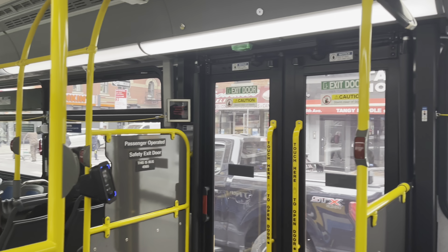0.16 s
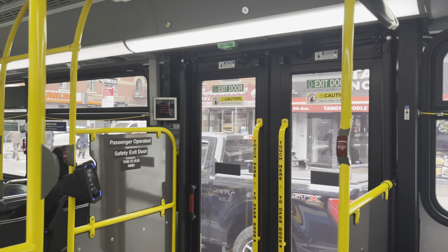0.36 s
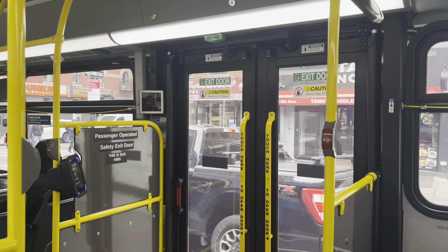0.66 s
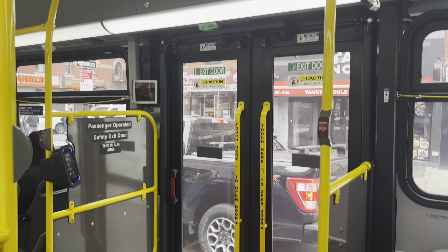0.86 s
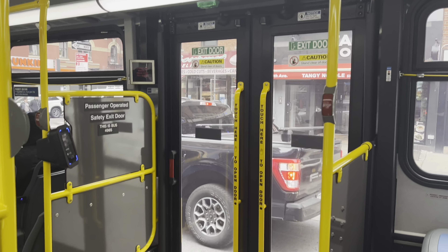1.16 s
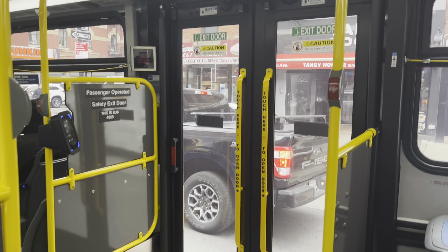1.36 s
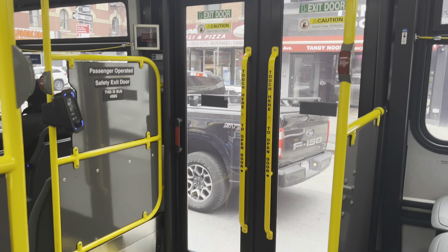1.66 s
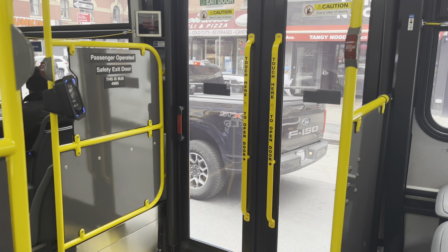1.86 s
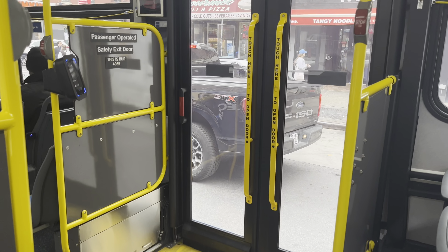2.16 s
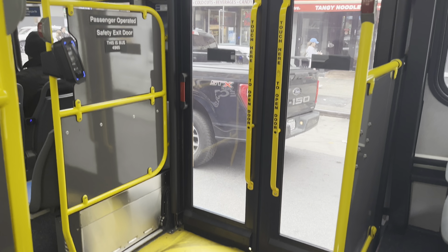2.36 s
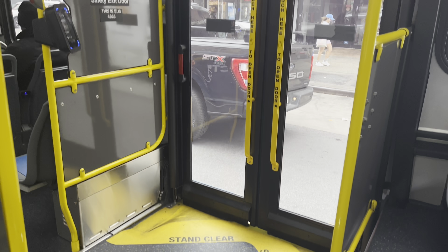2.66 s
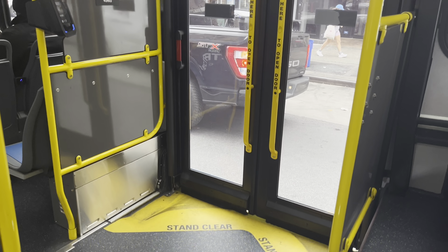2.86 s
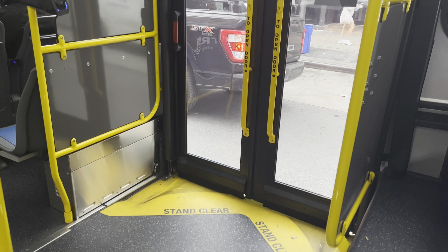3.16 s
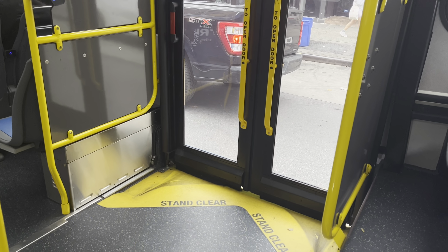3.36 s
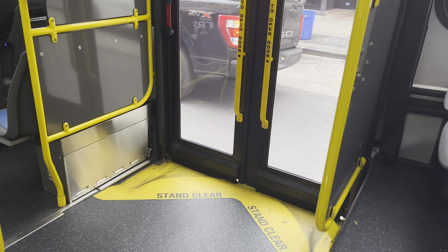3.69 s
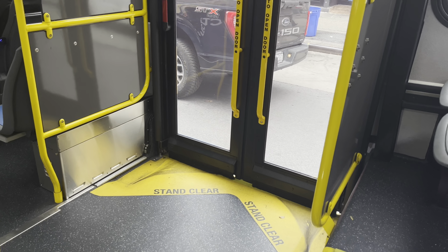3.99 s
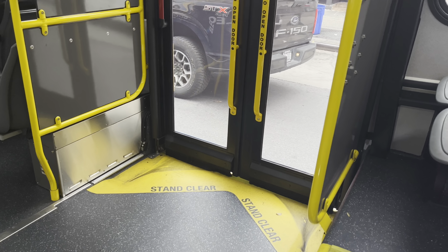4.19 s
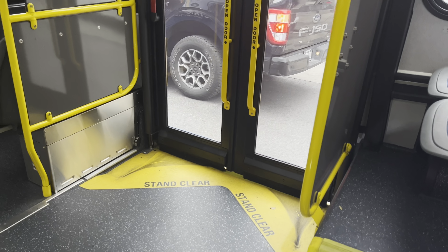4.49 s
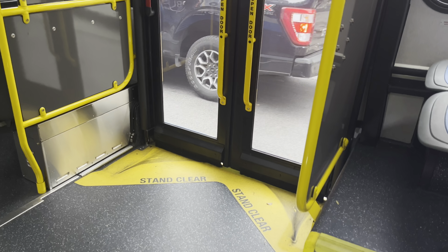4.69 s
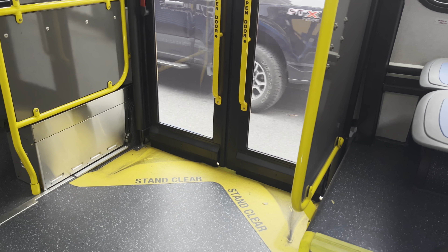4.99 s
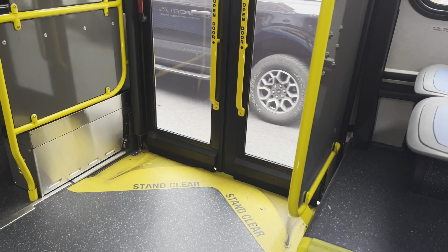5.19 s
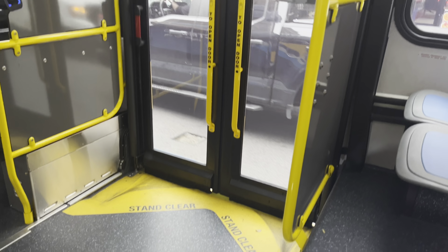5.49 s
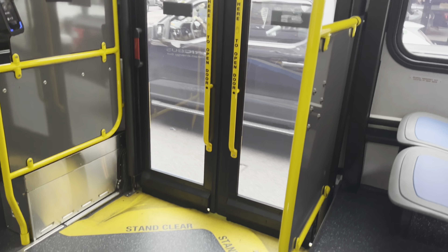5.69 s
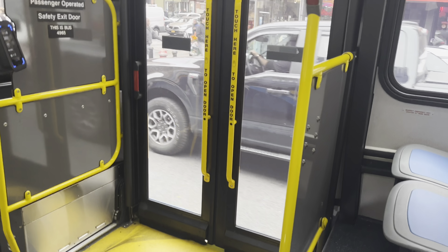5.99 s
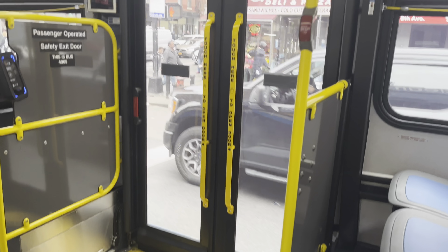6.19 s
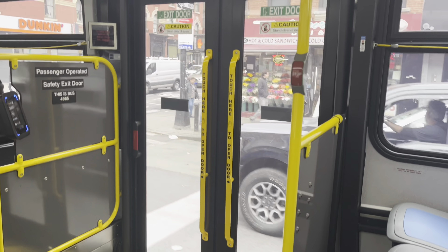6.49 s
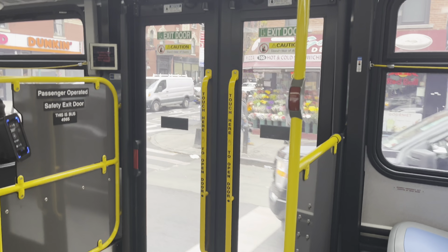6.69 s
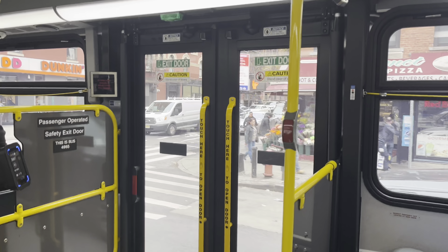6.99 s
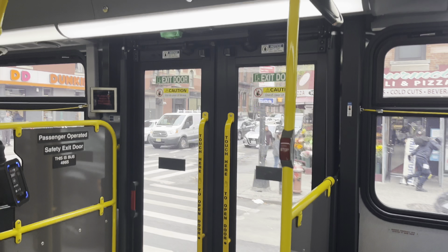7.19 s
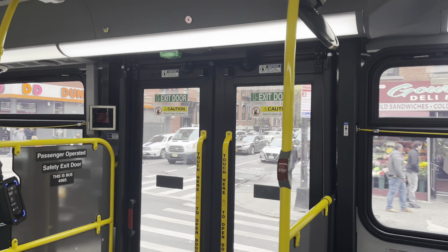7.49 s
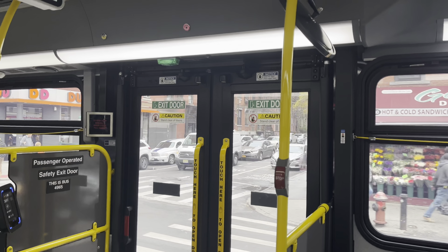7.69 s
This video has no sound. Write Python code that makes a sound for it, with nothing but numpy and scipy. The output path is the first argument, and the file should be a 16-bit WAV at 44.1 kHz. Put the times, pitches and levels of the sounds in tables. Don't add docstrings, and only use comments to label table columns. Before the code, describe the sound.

Heard from a handheld phone inside an electric bus: a deep compressor hum, fan tones and vent hiss fill the cabin while it waits, with dull thuds and a soft gasp of valve air. Then the motor starts, its low growl climbing smoothly into a whine over road rumble, with small air puffs, clicking ticks and more muffled knocks. The stereo hum shifts as the phone moves.

```python
import sys
import numpy as np
from scipy import signal
from scipy.fft import rfft, irfft, next_fast_len
from scipy.io import wavfile
from scipy.ndimage import uniform_filter1d

SR = 44100
rng = np.random.default_rng(int(sys.argv[2]) if len(sys.argv) > 2 else 0)


def magnitude_from_level(level_db):
    exponent = np.asarray(level_db, float) / 20
    return 10 ** exponent


def to_wav(s):
    ch = np.atleast_2d(s).T
    pcm = np.round(np.clip(ch, -1, 1) * 32767)
    wavfile.write(sys.argv[1], SR, pcm.astype(np.int16))


N = 346185
T = np.arange(N) / SR
COARSE = np.arange(0, N + 64, 64) / SR
SIZE = next_fast_len(N)
BINS = np.maximum(np.arange(SIZE // 2 + 1) * SR / SIZE, 1)

# (time [s], place [0 doors .. 7 rear], facing the floor [0-1],
# treble left minus right [dB])
PHONE_PATH = [(0, -0.5, 0.1, 2), (1.05, 0, 0, 2.5), (1.5, 1, 0.6, 2.5), (2.1, 1, 1, 1),
              (2.35, 1.5, .9, 2.5), (2.65, 3, 0.8, 3), (3.3, 3, .85, 3), (3.6, 4, 1, 1),
              (4.1, 4, 0.94, 2.5), (4.5, 5, 1, 2.5), (5.3, 5, 0.7, 1), (6.03, 5, 0.7, 5),
              (6.35, 6, 0.1, 3.5), (6.9, 6, 0, 3.5), (7.4, 7, 0, 3), (7.85, 7, 0, 4.5)]

SHAFT_HZ = 107.97
SHAFT_ORDERS = [1, 4, 8, 12, 16]
FAN_HZ = [415.3, 699.8, 1049.8, 1421.5, 2327.7, 2436.7, 4000.0, 5183.0]
# (left level [dB], right level [dB], left leads [rad])
AT_DOORS = [(-37, -42, 0.3), (-40, -43, -0.1), (-40, -67, -0.7), (-59, -60, -2.7), (-52, -54, -2.5),
            (-59, -60, 3.1), (-47, -46, 0.8), (-52, -51, -2.2), (-59, -55, 2.6), (-65, -64, 2.6),
            (-65, -71, 2.9), (-89, -82, 0.3), (-69, -73, -1.1)]
AT_TURN = [(-34, -37, 0.2), (-48, -46, 0.0), (-40, -43, 0.0), (-77, -57, -1.3), (-55, -53, -2.6),
           (-55, -57, 3.0), (-59, -60, 0.8), (-63, -60, -2.3), (-55, -65, 2.2), (-62, -66, 1.3),
           (-72, -83, 1.9), (-79, -87, -0.0), (-70, -77, 0.1)]
AT_SWING = [(-33, -35, 0.2), (-43, -42, -0.1), (-40, -40, -0.1), (-60, -56, 2.4), (-67, -51, 0.2),
            (-48, -61, 3.0), (-55, -54, 1.2), (-57, -59, -2.4), (-58, -57, -2.2), (-71, -63, 3.1),
            (-63, -71, -3.1), (-94, -95, 2.6), (-96, -79, 0.5)]
AT_FLOOR = [(-32, -33, 0.1), (-47, -47, 0.3), (-41, -40, -0.6), (-56, -56, 2.0), (-46, -49, 0.5),
            (-46, -65, -2.9), (-45, -43, 3.1), (-56, -58, -0.1), (-52, -63, -1.8), (-65, -64, 2.6),
            (-61, -71, -0.6), (-87, -92, 0.7), (-69, -76, -0.1)]
AT_LEAN = [(-34, -36, 0.0), (-47, -48, 0.5), (-41, -41, -0.6), (-51, -52, 1.9), (-45, -49, 0.4),
           (-50, -62, -2.6), (-46, -44, 3.1), (-57, -57, -0.0), (-59, -83, 1.7), (-62, -63, 2.6),
           (-61, -68, -0.8), (-80, -93, 0.7), (-67, -83, -0.8)]
AT_STEP = [(-35, -38, 0.1), (-47, -47, 0.4), (-39, -40, -0.5), (-53, -53, 1.9), (-45, -52, 0.1),
           (-56, -58, -3.0), (-49, -45, 2.9), (-52, -54, 0.5), (-57, -57, -1.9), (-63, -67, 1.9),
           (-74, -76, 0.5), (-67, -75, 2.2), (-74, -81, -1.8)]
AT_WINDOW = [(-39, -45, 0.3), (-44, -49, 0.7), (-37, -47, 0.2), (-59, -64, 0.6), (-54, -55, -3.1),
             (-50, -52, 1.3), (-61, -51, 2.8), (-61, -64, 2.8), (-55, -58, -0.2), (-63, -67, 3.1),
             (-72, -70, 3.1), (-62, -77, 3.0), (-65, -82, 0.7)]
AT_REAR = [(-37, -39, 0.5), (-43, -47, -0.1), (-39, -52, 0.7), (-63, -58, 0.2), (-58, -57, 3.1),
           (-52, -54, 2.6), (-51, -49, 1.7), (-68, -61, -1.9), (-57, -53, 2.3), (-68, -81, 1.0),
           (-69, -67, -0.8), (-61, -68, -1.7), (-72, -88, -0.4)]

# (time [s], main order [Hz])
MOTOR_SPEED = [(3.6, 38.7), (3.86, 46.5), (4.1, 59.6), (4.4, 81.2), (5.03, 131.2), (5.42, 165), (5.55, 174),
               (5.8, 189), (5.93, 201), (6.09, 211.6), (6.63, 245), (7.0, 266), (7.43, 283), (7.85, 296)]
ORDERS_DB = [
    -0.5,
    -12,
    -10.5,
    -23,
    -19,
]
# (frequency [Hz], width [Hz], level [dB])
BODY_MODES = [(53, 20, -35.5), (65.7, 8.5, -22), (74.6, 9.5, -20.5), (86.7, 12, -26.5), (97.5, 8, -30),
              (108.8, 7, -24), (120.7, 10, -27), (129.3, 11, -24), (140.7, 8, -27.5), (175.5, 9, -25),
              (183.8, 11.1, -22), (208.8, 22.4, -30.5), (226, 5.9, -45), (291, 44, -39)]
# (time [s], level [dB])
GEAR_LEVEL = [(4.3, -66), (4.68, -41), (4.95, -62), (6.3, -51), (6.6, -60), (6.97, -56), (7.25, -59),
              (7.5, -57), (7.7, -51), (7.85, -50)]
# (loudest at [s], frequency then [Hz], climb [Hz/s], level [dB])
SPIN_UP = [
    (2.1, 1560, 69.7, -56),
    (6.3, 1478, 105, -57.5),
]

# (time [s], level [dB], rise [s], t60 [s], left minus right [dB])
PUFFS = [(.72, -65, .02, .2, 4), (2.29, -45.5, 0.087, 0.71, 2.5), (2.42, -59.5, 0.034, 0.55, 0),
         (3.23, -55.5, 0.025, 0.33, 1), (3.313, -54.5, .006, 0.44, 2), (3.44, -56, 0.033, 0.43, 1),
         (4.13, -57.5, .02, 0.35, -3), (4.222, -46.5, 0.003, 0.3, 3), (4.235, -55, 0.015, 0.6, 4.5),
         (5.52, -62, .05, .9, -5), (5.84, -57, .04, .6, 3), (6.031, -55.5, .003, .3, 2),
         (6.105, -56, .003, 0.27, 3), (6.69, -59, .03, .4, 0), (6.937, -56, 0.0033, 0.38, 3),
         (7.605, -60, .005, 0.2, -2), (7.627, -60, .005, 0.37, -3), (7.72, -59, .005, .3, 0)]
# (frequency [Hz], level per Hz [dB])
JET_SPECTRUM = [(1200, -31), (2500, -6), (3500, 4), (5000, -0.5), (6500, -3), (7800, -12), (9000, -10),
                (11000, -5.5), (13500, -8), (14600, -15.5), (15000, -50)]
# (time [s], level [dB])
TICKS = [
    (3.325, -60),
    (4.22, -50),
    (6.017, -56),
    (6.030, -45),
    (6.105, -38.5),
    (6.937, -42.5),
    (7.72, -49),
]
# (time [s], level [dB], frequency [Hz], t60 [s], left leads [rad])
THUDS = [(.11, -22.5, 79, 0.26, .3), (0.77, -22.5, 75, 0.34, 0.26), (1.4383, -20, 90, 0.14, 0.75),
         (2.31, -29, 211, 0.27, 0.33), (2.419, -33, 171.7, 0.31, .3), (2.52, -31, 196, 0.16, .3),
         (3.45, -30, 76, 0.45, 0.24), (3.84, -38, 700, 0.11, 1.7), (4.03, -46, 828, 0.39, 1.8),
         (6.922, -32, 148, 0.33, 0.26), (7.38, -27.5, 95.7, 0.24, 0.32), (7.52, -36.5, 399, 0.23, 0.86),
         (7.53, -42, 860, 0.21, 3.2), (7.525, -48, 1300, 0.15, 1.0), (7.53, -46, 1560, 0.1, .5),
         (7.562, -39, 1450, .03, .5), (7.562, -44, 1780, .03, .5), (3.6, -34, 210, 0.47, .3),
         (4.24, -34.5, 220, 0.39, .3), (5.1, -38, 222, 0.41, .3), (2.402, -47, 3300, .04, .5),
         (2.455, -47, 2750, .05, .5), (2.32, -45, 2480, .05, .5), (6.9, -35, 250, 0.28, .3),
         (7.72, -46, 605, 0.5, 0.51), (7.56, -36.5, 1560, 0.04, .5), (7.61, -43, 519, 0.49, .4),
         (2.34, -27, 90.5, 0.11, .3), (2.38, -36, 190, 0.17, .3), (7.63, -46, 1480, .08, .5)]

# (frequency [Hz], level per Hz [dB])
CABIN_SPECTRUM = [(22, -18), (45, -1.5), (70, 0.5), (96, -2.5), (125, -7.5), (160, -7.5), (216, -11.5),
                  (320, -11.5), (420, -13), (500, -16), (620, -22), (846, -21.5), (1220, -27), (1500, -26),
                  (1800, -29.5)]
HISS_SPECTRUM = [(1060, -34), (1800, -1.5), (2100, -1), (2380, -1), (2440, -2), (2880, -6), (3390, -8.5),
                 (4180, -7.5), (4640, -10), (5380, -13.5), (5920, -16.5), (6570, -18.5), (7880, -32.5),
                 (13100, -29), (14400, -33), (15000, -75)]
# (frequency [Hz], correlation [-1 to 1])
ALIKE_DOORS = [(60, 0.21), (130, 0.64), (280, 0.55), (620, -0.34), (1350, -0.36), (2930, -0.16),
               (6390, -0.22), (13900, 0.53)]
ALIKE_FLOOR = [(60, 0.78), (130, 0.82), (280, 0.76), (620, -0.27), (1350, -0.64), (2930, -0.084),
               (6390, -0.14), (13900, 0.52)]
# (frequency [Hz], left minus right [dB])
LEFT_MORE = [(60, -0.5), (110, 3), (200, -0.5), (370, 2), (680, -1), (1240, 6), (2260, -1.5), (4150, 9),
             (7600, 3), (13900, -10.5)]
# (time [s], level [dB])
ROAD = [(0, 0), (.5, -0.5), (2, 0), (2.4, -2.5), (2.65, 0.5), (3.2, -1), (3.85, 3), (4.5, 1), (5.05, 3.5),
        (5.6, 2.5), (6.2, 0.5), (7.3, 3), (7.6, 2), (7.85, 1.5)]
# (time [s], level [dB], length [s])
RUSHES = [
    (0, 1, .1),
    (.76, 4.5, 0.045),
    (2.424, 1.5, 0.15),
    (5.36, 1.5, .15),
    (7.59, 1, 0.11),
]
# share of the shaking, change facing the floor [dB],
# share of the rushes
ROAD_SHARE = [1.53, .1, 0.2, 0.086]
FLOOR_DB = [-0.8, -0.45, -0.56, .2]
RUSH_SHARE = [.01, .2, .3, 1.01]

# (frequency [Hz], level [dB])
SUM_COLOUR = [(7000, 0.5), (7700, 0), (8100, -0.5), (8700, 1), (9500, 1), (13300, -3), (13900, -5),
              (14500, -8), (15000, -10), (16000, -13.5)]
DIFFERENCE_COLOUR = [(6500, -1), (8000, 4), (10200, 2), (10500, -31.5), (13100, -30), (13500, -8.5),
                     (14000, 3), (15000, -4), (15500, -12), (16000, -29.5)]


def curves(table, times=COARSE):
    s, *columns = np.transpose(table)
    return [np.interp(times, s, column) for column in columns]


def at_hz(table, hz):
    table_hz, values = np.transpose(table)
    return np.interp(np.log(hz), np.log(table_hz), values)


def fine(control):
    return np.interp(T, COARSE, control)


def unit(x):
    return x / np.sqrt(np.mean(x ** 2))


def walk(rate):
    k = max(int(SR / 64 / rate), 2)
    held = np.repeat(rng.standard_normal(len(COARSE) // k + 1), k)[:len(COARSE)]
    return unit(uniform_filter1d(uniform_filter1d(held, k), k))


def sides(pan_db):
    return magnitude_from_level(np.array([pan_db, -pan_db]) / 2)


def resonance(hz, centre_hz, width_hz):
    return 1 / (1 + (2 * (hz - centre_hz) / width_hz) ** 2)


def hum(place):
    tones_hz = np.sort(np.r_[SHAFT_HZ * np.array(SHAFT_ORDERS), FAN_HZ])
    field = np.array([AT_DOORS, AT_TURN, AT_SWING, AT_FLOOR, AT_LEAN, AT_STEP, AT_WINDOW, AT_REAR])
    out = np.zeros((2, N))
    for k, hz in enumerate(tones_hz):
        tone = np.exp(2j * np.pi * hz * T)
        for ear, lead in enumerate((1, 0)):
            wave = magnitude_from_level(field[:, k, ear]) * np.exp(1j * lead * field[:, k, 2])
            tremble_rad = 1.2 if 2000 < hz < 3000 else 0.15
            tremble = magnitude_from_level((0.6 + hz / 2500) * walk(4)) * np.exp(1j * tremble_rad * walk(5))
            heard = np.interp(place, np.arange(len(field)), wave) * tremble
            out[ear] += np.sqrt(2) * (fine(heard) * tone).imag
    return out


def motor():
    opposed_above_hz, body_floor_db = 195, -51.5
    hz, = curves(MOTOR_SPEED)
    turn = 2 * np.pi * np.cumsum(fine(hz)) / SR + np.array([[0.25], [-0.25]])
    running = np.clip((T - MOTOR_SPEED[0][0]) / 0.3, 0, 1)
    orders = 0
    for db, ratio in zip(ORDERS_DB, (1, 1 / 3, 3.1, 4 / 5, 3 / 2)):
        body = magnitude_from_level(body_floor_db) * np.sign(opposed_above_hz - ratio * hz)
        for mode_hz, width_hz, mode_db in BODY_MODES:
            swell = resonance(ratio * hz, mode_hz, width_hz) ** 2
            body = body + np.sign(opposed_above_hz - mode_hz) * magnitude_from_level(mode_db) * swell
        orders = orders + fine(magnitude_from_level(db) * body) * np.sin(ratio * turn)
    return np.sqrt(2) * running * orders * sides(1.2)[:, None]


def gear():
    hz, = curves(MOTOR_SPEED)
    level_db, = curves(GEAR_LEVEL)
    turn = 2 * np.pi * 2.08 * np.cumsum(fine(hz + 0.4 * walk(8))) / SR
    return np.sqrt(2) * fine(magnitude_from_level(level_db + 3.5 * walk(13))) * np.sin(turn + np.array([[0.5], [0]]))


def spin_up():
    waver_hz, flutter_db = 12 * walk(30), 3.5 * walk(12)
    out = 0
    for s, hz, climb, db in SPIN_UP:
        away = COARSE - s
        turn = 2 * np.pi * np.cumsum(fine(hz + climb * away + waver_hz)) / SR
        gain = magnitude_from_level(db - 16.5 * away ** 2 + flutter_db)
        out = out + np.sqrt(2) * fine(gain) * np.sin(turn + np.array([[0], [1.3]]))
    return out


def thuds():
    longest = SR // 3
    out = np.zeros((2, N))
    slip = np.cumsum(rng.standard_normal((len(THUDS), 3, 1, longest)), axis=3)
    for (s, db, hz, t60, lead), wander in zip(THUDS, slip):
        at = int(s * SR)
        t = T[:min(longest, N - at)]
        turn = 2 * np.pi * hz * t + np.array([[lead], [0]])
        loose = np.sqrt(0.25 * hz / SR) * uniform_filter1d(wander, int(SR / hz))[..., :len(t)]
        ring = np.sin(turn + loose[0])
        ring = ring + 0.5 * np.sin(1.3 * turn + loose[1])
        ring = ring + 0.24 * np.sin(1.9 * turn + loose[2])
        push = 1 - np.exp(-t * (hz + 150) / 5.0)
        decay = 1000 ** (-t / t60) * np.sqrt(1 - 3 * t)
        out[:, at:at + len(t)] += magnitude_from_level(db + 6.0) * push * decay * ring
    return out


def puffs():
    noise = rfft(rng.standard_normal((3, SIZE)))
    jet = unit(irfft(noise * magnitude_from_level(at_hz(JET_SPECTRUM, BINS)), SIZE)[:, :N])
    jet = (0.53 * jet[0] + 1.48 * jet[1:]) * fine(magnitude_from_level(1.6 * walk(200)))
    out = np.zeros((2, N))
    for s, db, rise, t60, pan_db in PUFFS:
        at = int(s * SR)
        t = T[:min(SR, N - at)]
        envelope = magnitude_from_level(db) * (1 - np.exp(-t / rise)) * 1000 ** (-t / t60)
        out[:, at:at + SR] += jet[:, at:at + SR] * envelope * sides(pan_db)[:, None]
    return out


def ticks():
    snaps = np.diff(rng.standard_normal((len(TICKS), 2, 302)), 2) / 2
    t = T[:300]
    ring = 0.99 * np.sin(2 * np.pi * 4600 * t)
    decay = np.exp(-t / 0.0012)
    out = np.zeros((2, N))
    for (s, db), snap in zip(TICKS, snaps):
        at = int(s * SR)
        out[:, at:at + 300] += magnitude_from_level(db) * ((snap + snap[0]) / 2 + ring) * decay
    return out


def pump(facing):
    tone = np.sin(2 * np.pi * 719 * T + np.array([[1.6], [0]]))
    return np.sqrt(2) * fine(magnitude_from_level(-63 + 4.0 * facing + 1.5 * walk(4.7))) * tone


def panel(facing):
    drone = irfft(rfft(rng.standard_normal(SIZE)) * resonance(BINS, 221, 15), SIZE)[:N]
    level_db = -45.5 - 12 * (1 - facing) - 8 * (COARSE < 2.6)
    return unit(drone) * fine(magnitude_from_level(level_db))


def duct(facing):
    song = irfft(rfft(rng.standard_normal((2, SIZE))) * resonance(BINS, 546, 22), SIZE)[:, :N]
    level_db = -49 - 12 * np.sqrt(facing) + 1.5 * walk(4)
    return unit(song + 0.6 * song[::-1]) * fine(magnitude_from_level(level_db))


def air(facing, pan_db):
    road_db, = curves(ROAD)
    rush_db = sum(db * np.exp(-((COARSE - s) / span) ** 2) for s, db, span in RUSHES)
    band_db = np.outer(ROAD_SHARE, road_db) + np.outer(FLOOR_DB, facing) + np.outer(RUSH_SHARE, rush_db)
    swell_db = band_db - np.mean(band_db, axis=1, keepdims=True)

    join_db = at_hz(CABIN_SPECTRUM, 1800) - at_hz(HISS_SPECTRUM, 1800)
    shape_db = np.where(BINS < 1800, at_hz(CABIN_SPECTRUM, BINS), at_hz(HISS_SPECTRUM, BINS) + join_db)
    ripple_db = np.interp(BINS, np.arange(1000) * 35, rng.standard_normal(1000))
    ripple_db = np.clip(BINS / 1500, 1, 2) * ripple_db
    noise = rfft(rng.standard_normal((2, SIZE))) * magnitude_from_level(shape_db + ripple_db)

    knots = np.log([60, 230, 560, 2500])
    out = np.zeros((2, N))
    for hz in 20 * 2 ** np.arange(0.5, 10.1, 0.5):
        band = np.clip(1 - 2 * abs(np.log2(BINS / hz)), 0, 1)
        same, other = irfft(noise * band, SIZE)[:, :N]
        alike = at_hz(ALIKE_DOORS, hz) * (1 - facing) + at_hz(ALIKE_FLOOR, hz) * facing
        alike = np.clip(alike, -0.95, 0.95)
        side = fine(np.sqrt((1 - alike) / (1 + alike))) * other
        follow = [np.interp(np.log(hz), knots, row) for row in np.eye(4)]
        shade = np.interp(hz, [600, 3000, 6500, 9000], [0, 1, 1, 0])
        left, right = sides(at_hz(LEFT_MORE, hz) + shade * (pan_db - pan_db.mean()))
        gain = magnitude_from_level((hz < 8000) * (follow @ swell_db) + 1.09 * walk(9))
        out[0] += fine(gain * left) * (same + side)
        out[1] += fine(gain * right) * (same - side)
    return unit(out) * magnitude_from_level(-32.5)


def scene():
    place, facing, pan_db = curves(PHONE_PATH)
    facing = np.clip(facing, 0, 1)
    machines = hum(place) + motor() + gear() + spin_up()
    events = thuds() + puffs() + ticks()
    background = pump(facing) + panel(facing) + duct(facing) + air(facing, pan_db)
    return machines + events + background


def band_limit(x):
    return signal.sosfilt(signal.butter(12, 16000, fs=SR, output="sos"), x)


def record(dry):
    bass_cut = signal.butter(3, 38.0, "high", fs=SR, output="sos")
    left, right = signal.sosfilt(bass_cut, dry)
    colour = magnitude_from_level(np.array([at_hz(SUM_COLOUR, BINS), at_hz(DIFFERENCE_COLOUR, BINS)]))
    ports = rfft(np.array([left + right, left - right]) / 2, SIZE)
    both, apart = irfft(ports * colour, SIZE)[:, :N]
    return band_limit(np.array([both + apart, both - apart]))


dry = scene()
out = record(dry)
to_wav(out)
```